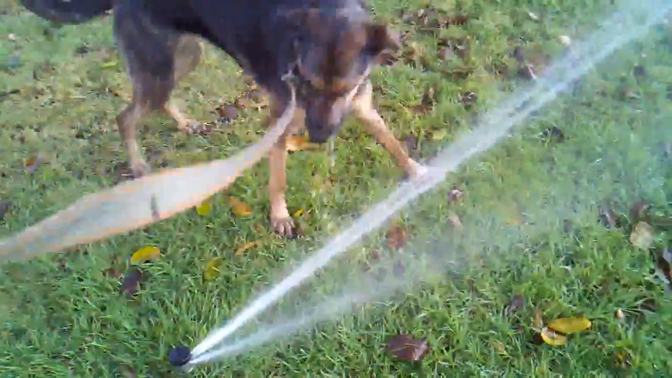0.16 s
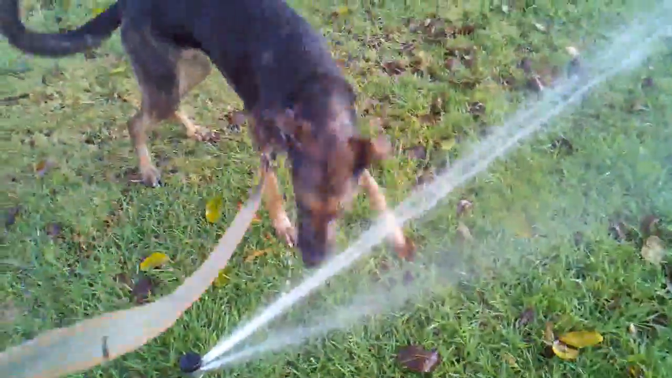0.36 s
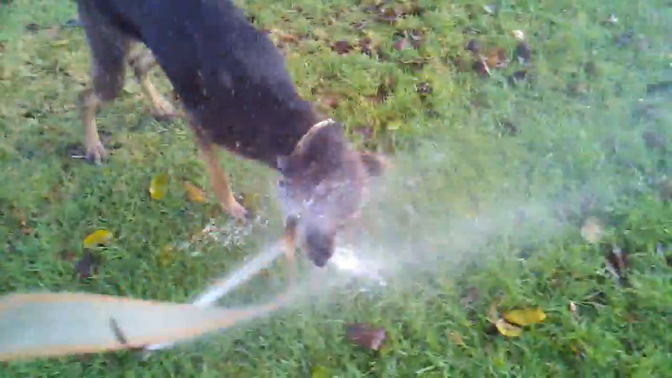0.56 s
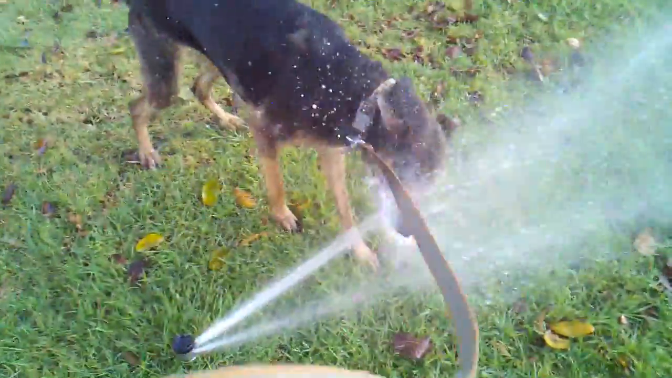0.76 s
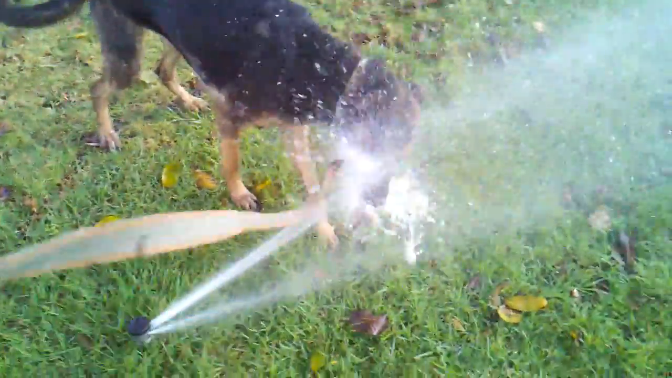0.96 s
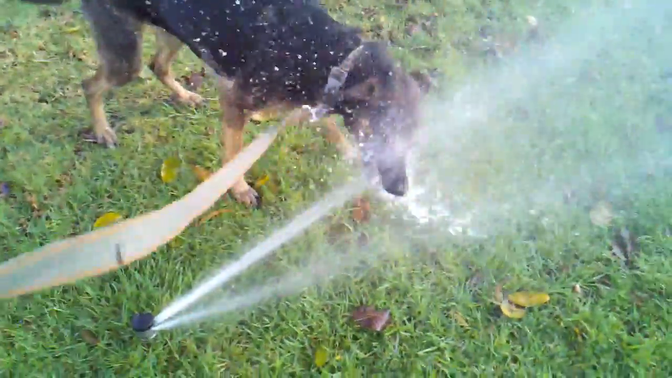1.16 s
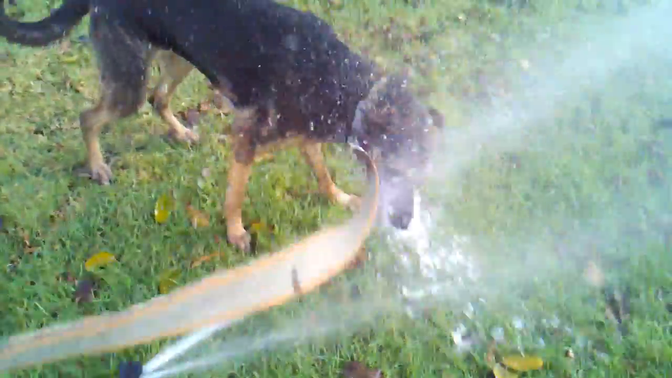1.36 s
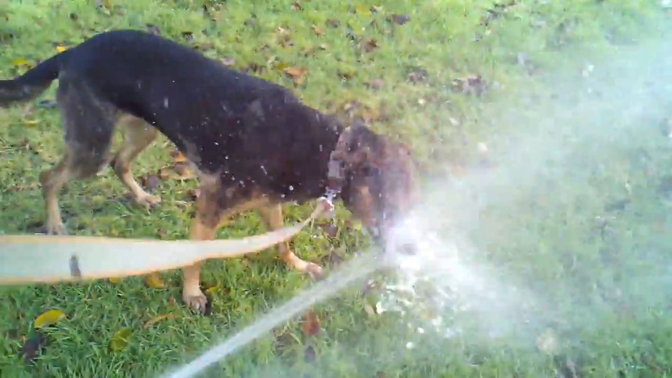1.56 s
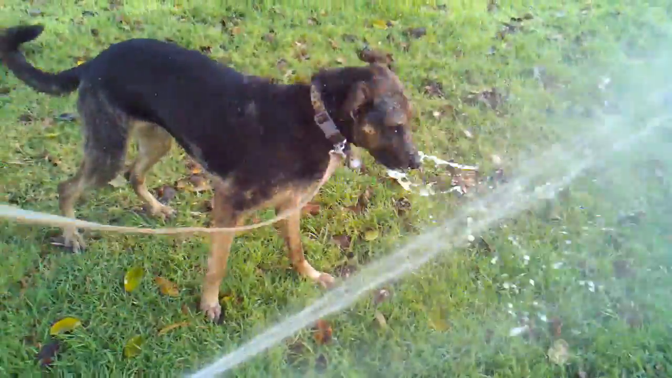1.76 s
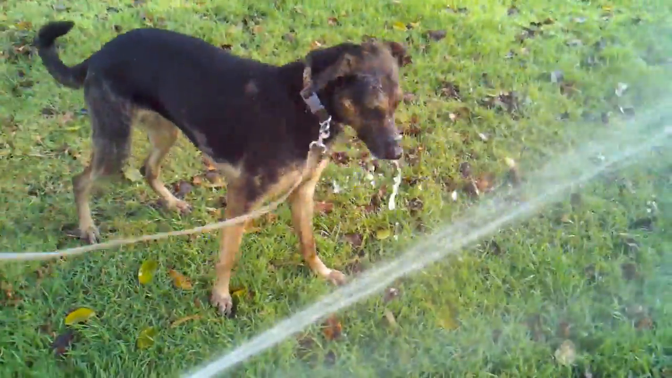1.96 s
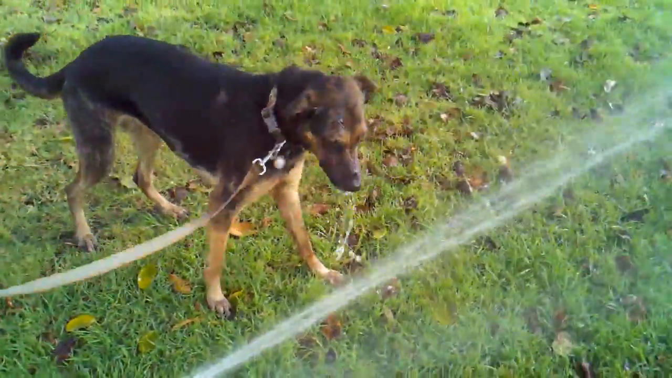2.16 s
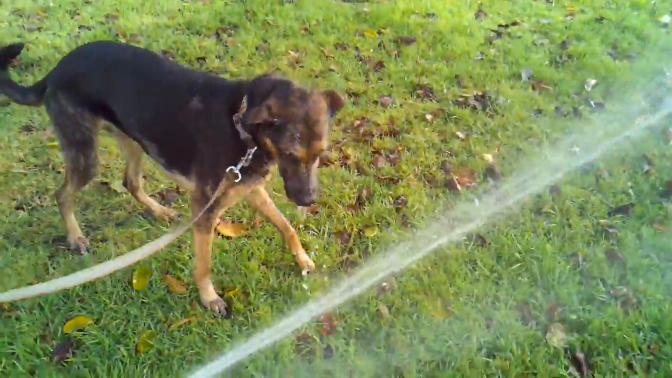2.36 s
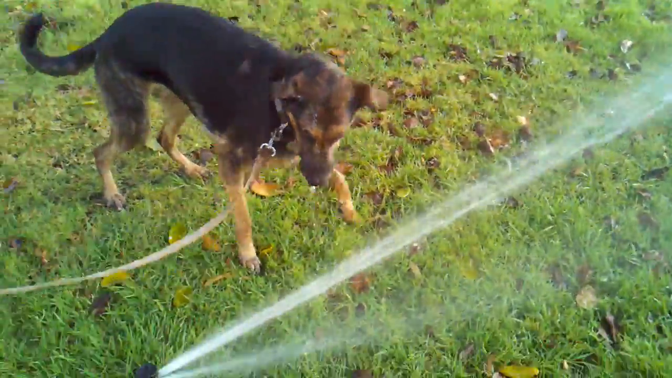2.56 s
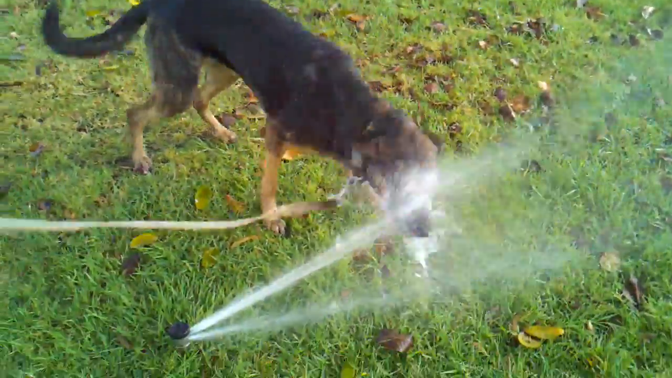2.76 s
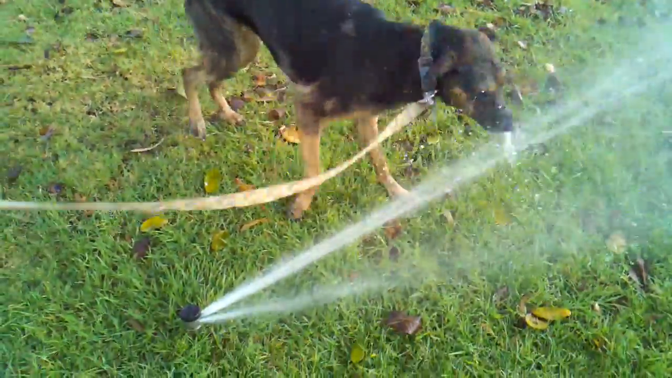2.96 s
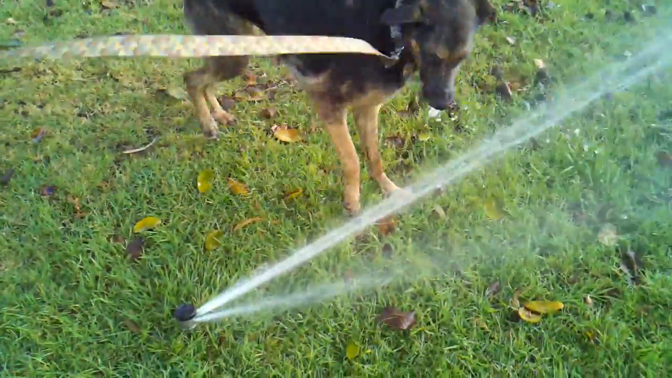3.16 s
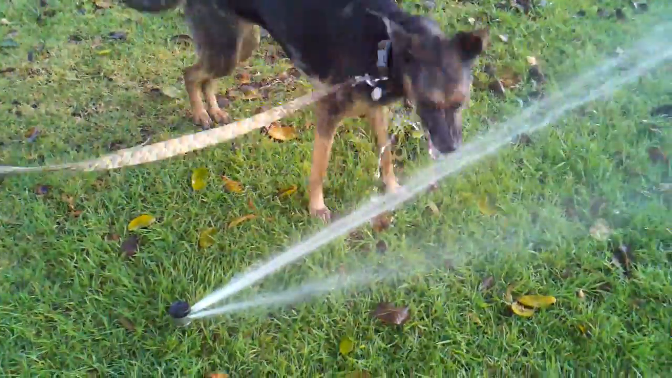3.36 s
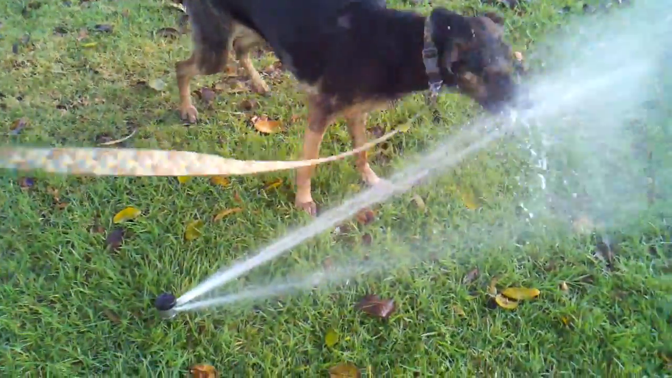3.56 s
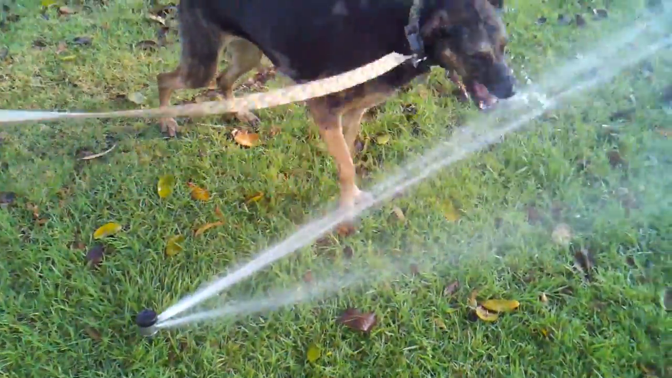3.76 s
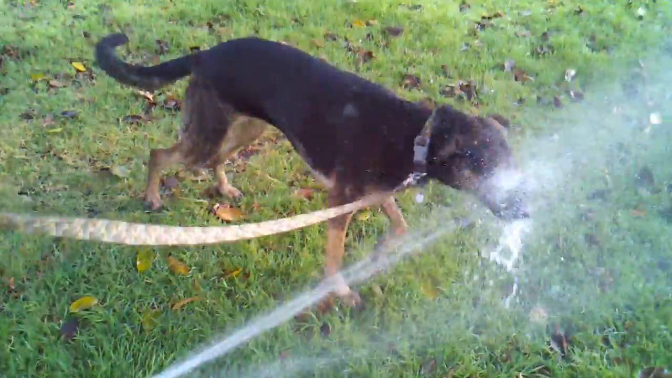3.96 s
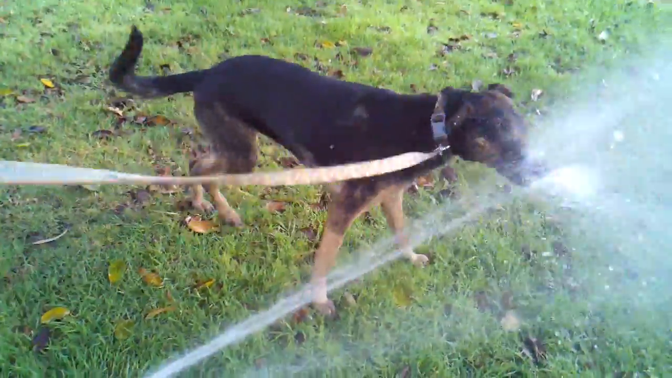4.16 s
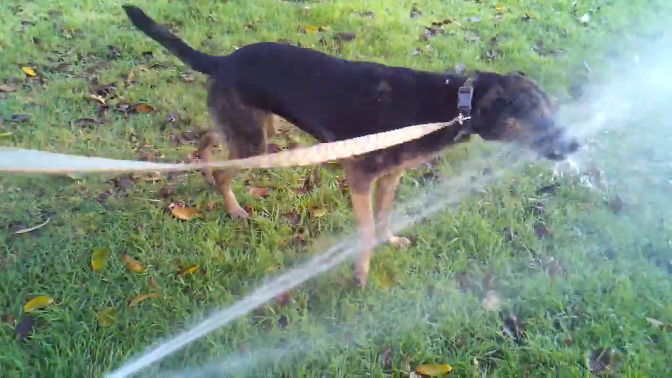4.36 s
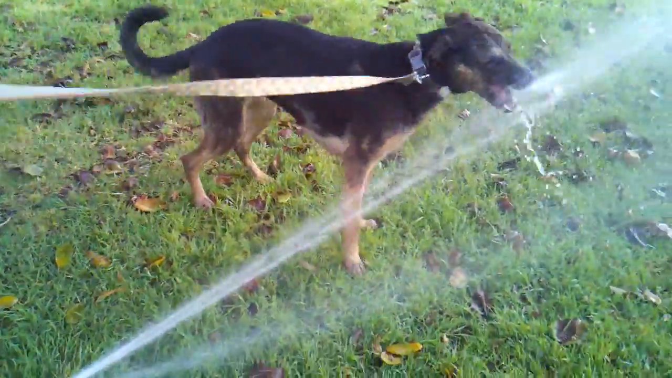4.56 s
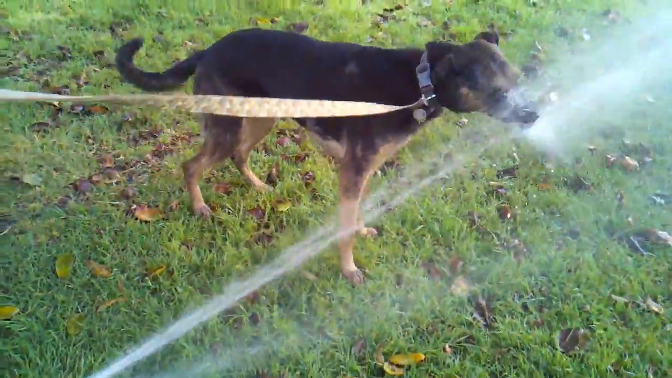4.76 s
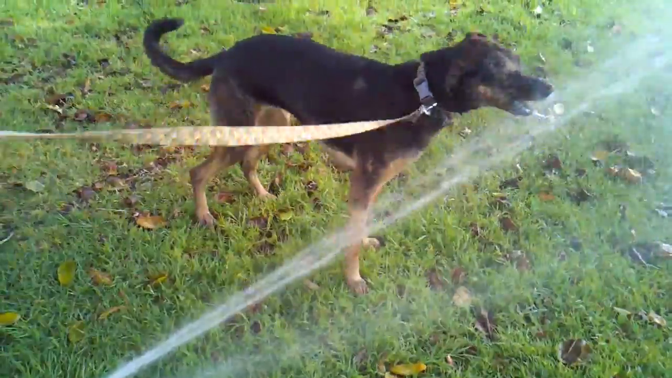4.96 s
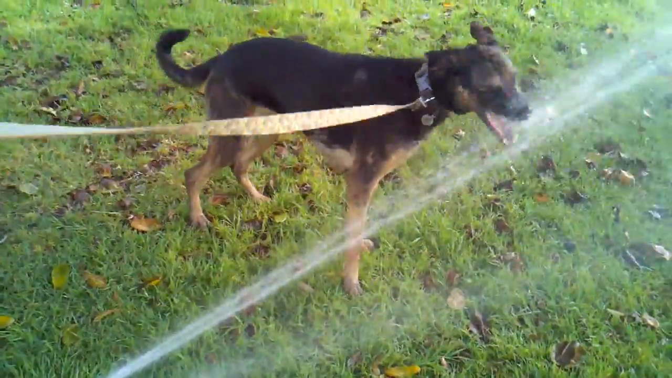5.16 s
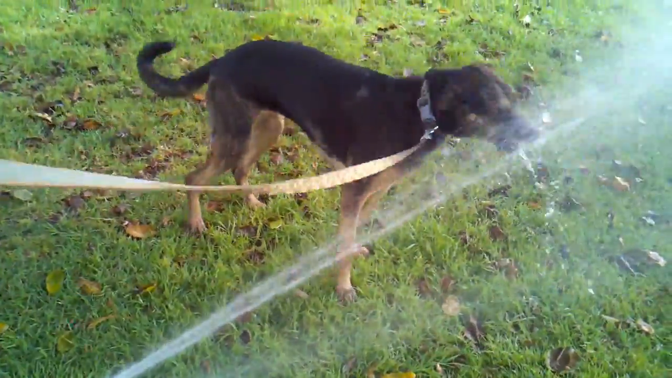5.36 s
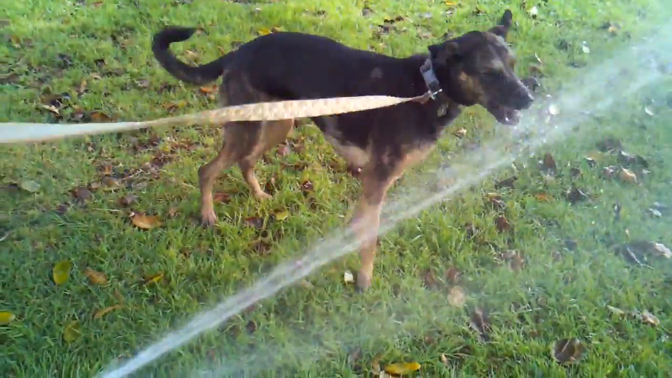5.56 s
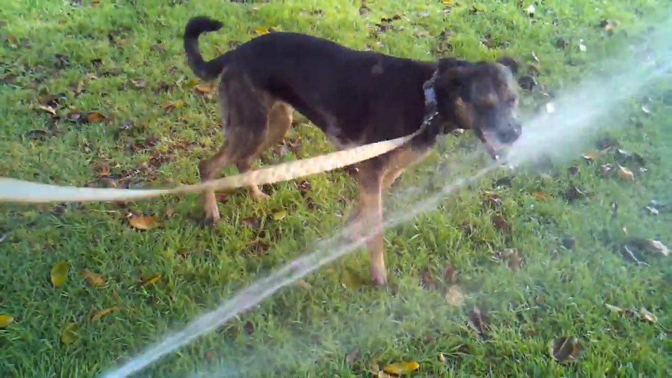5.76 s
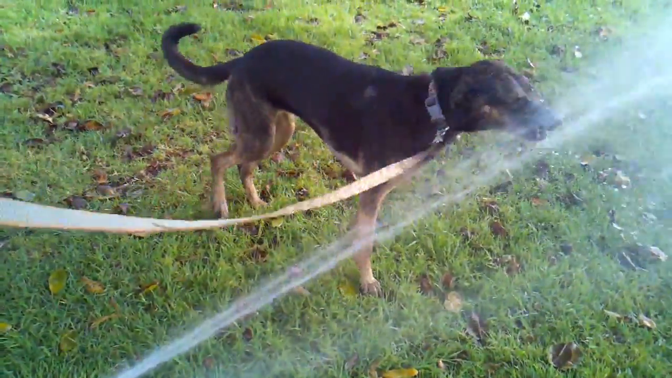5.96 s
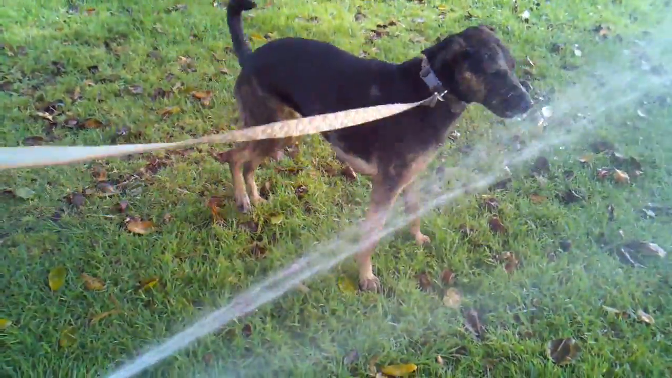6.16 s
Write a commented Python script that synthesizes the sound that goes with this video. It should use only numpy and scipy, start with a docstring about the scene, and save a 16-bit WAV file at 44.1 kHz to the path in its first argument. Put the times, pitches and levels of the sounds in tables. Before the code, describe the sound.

A lawn sprinkler hisses steadily while a dog bites at the jet in wet, gurgling splashes, with distant cars accelerating and soft handling knocks.

```python
"""Dog at the lawn sprinkler

In front, a sprinkler sizzles (shaped noise and random impacts) and patters on the grass, while a dog bites
at the jet: noise for the spray, resonated drops and bubbles for its mouth, decaying rings for slaps and plops.
Far off, a little to the right, cars pull away up a road: harmonic exhaust notes over banded rumble and tyre roar.
Close to the microphones, soft knocks on the hand-held camera ring as short, dull modes of its body."""
import sys
import numpy as np
from scipy import signal
from scipy.fft import rfft, irfft
from scipy.io import wavfile
from scipy.ndimage import uniform_filter1d

SR = 44100
rng = np.random.default_rng(int(sys.argv[2]) if len(sys.argv) > 2 else 0)


def to_wav(sig):
    """Store sig (one row per channel, or 1-D mono) as 16-bit WAV at the path in sys.argv[1].

    Samples outside -1..1 are clipped; the rate is SR.
    """
    pcm = np.clip(np.atleast_2d(sig), -1, 1) * 32767
    pcm = np.round(pcm).astype(np.int16)
    wavfile.write(sys.argv[1], SR, pcm.T)  # frames by channels


N = 274302
TIME, FREQ = np.arange(N) / SR, np.fft.rfftfreq(N, 1 / SR)

# All levels in the tables are relative: gains and placing may follow.
# the free jet, in front: start_s, sizzle_db, patter_on_grass_db, dip_in_sizzle_hz
JET = [(.52, -38.5, -44.5, 11600), (.9, -36, -41.5, 11800), (1.9, -33, -46.5, 11300),
       (2.7, -31, -44, 11350), (3.3, -31, -41.5, 10950), (4.6, -30, -48.5, 11200), (6.22, -30, -45, 11000)]
DIP_SHARE, DIP_WIDTH_HZ = 0.65, 630  # a narrow dip in the sizzle drifts as the camera moves
# distant traffic drawing nearer: start_s, rumble_db
ROAD = [(.5, -55), (1.3, -49.5), (2.2, -47), (2.8, -46), (5.3, -44.5), (6.22, -44.5)]
# swells of tyre roar: loudest_s, half_length_s, rise_db
TYRE_SWELLS = [(1.7, 0.28, 3), (3.056, 0.61, 4), (3.507, 0.22, 5), (5.095, 0.41, 4), (5.842, .2, 4.5)]
# a car pulling through a gear: throttle_opens_s, throttle_closes_s, first_firing_hz, climb_hz_per_s, level_db
PULLS = [(0, 0.52, 64, 1, -54), (1.601, 4.85, 45.69, 22.5, -49), (4.422, 6.22, 53.1, 38.5, -47.5)]
# partials of the exhaust note: multiple_of_firing_rate, level_db
EXHAUST = [(1, 0.5), (1.5, -6.5), (2, -1), (2.5, -11), (3, -4.5), (4, -9), (4.5, -13.5), (5, -27), (6, -14)]
THROTTLE_S, COAST_S = 0.57, 0.43  # rise and decay of the exhaust
COAST_SAG_PER_S = 0.57  # rate at which a coasting engine loses speed
BRIGHT_HZ, DULL_DB_PER_OCTAVE = 88, 10.5  # below this firing rate the upper partials weaken
# hollow tones in the road noise: start_s, end_s, first_pitch_hz, last_pitch_hz, level_db
DRONES = [(0.36, 1.55, 400, 398, -53.5), (3.35, 3.947, 180, 186, -47.5), (5.2, 5.346, 174, 180, -46),
          (5.45, 6.15, 314, 298, -49), (1.85, 2.05, 394, 370, -50.5), (2.801, 3.597, 551, 504, -46.5),
          (3.1, 3.342, 358, 380, -45), (3.462, 3.646, 387, 373, -41), (3.853, 4.4, 336, 351, -46.5),
          (4.48, 4.683, 211, 232, -42.5), (4.546, 5.1, 530, 495, -45.5), (5.75, 5.933, 450, 486, -44)]
DRONE_EDGE_S, DRONE_WIDTH_HZ = 0.065, 25
# bites at the jet: full_contact_s, held_s, rise_s, release_s, spray_db, swell_over_hold_db, champing_db,
# coarse_drops_db, mouth_drumming_db, mouth_resonance_hz
BITES = [(.565, .21, 0.016, .07, -33.5, 0, -1.5, -35.5, -38, 1160),
         (.636, 0.019, 0.026, .02, -37, 1, 2, -33, -46, 1200),
         (.79, 0.069, 0.027, 0.018, -40.5, 5, 0, -49.5, -39, 1331),
         (.901, .6, 0.027, .045, -31.5, -1.5, 1.4, -43, -36, 1480),
         (1.568, 0.17, 0.1, .041, -29.5, -0.5, 0.5, -55, -34.5, 1260),
         (2.854, 0.11, 0.018, 0.054, -26.5, 3, 0, -55, -32.5, 1060),
         (3.548, 0.12, 0.016, .026, -25.5, 3.5, -0.5, -35, -31.5, 1190),
         (4.009, 0.026, 0.028, 0.027, -25.5, -3.5, -2, -36, -37, 1100),
         (4.066, 0.26, 0.015, .055, -30.5, -1, 1, -36.5, -34.5, 1250),
         (4.45, 0.01, 0.055, 0.041, -28, 0, -0.5, -51, -30.5, 1360),
         (4.74, 0.1, 0.049, .03, -42, -7, -1, -50, -39, 1100),
         (4.91, 0.047, 0.06, .063, -28, 0.5, 1, -41, -35.5, 980),
         (5.365, 0.044, 0.054, 0.047, -26.5, 2, 1, -39, -38, 1450),
         (5.945, .035, .057, 0.088, -27.5, 1, 1, -39, -32.5, 1240)]
CHAMP_PER_S, LAST_CHAMP_S = 8.5, 0.04  # the champing cycle peaks this long before release begins
MOUTH_EDGE = 0.34  # the mouth fills and empties in this share of the spray's rise and release
MOUTH_SAG = 0.037  # its resonance sinks by this share either side of mid-bite as the jaws part
# the mouth rings hollow as it gulps: start_s, length_s, first_pitch_hz, last_pitch_hz, level_db
GULPS = [(0.612, 0.017, 1400, 1370, -35), (0.64, 0.012, 1110, 960, -33), (0.668, 0.01, 980, 1000, -42),
         (0.716, 0.033, 764, 920, -41.5), (5.363, 0.024, 1510, 1420, -41)]
GULP_EDGE_S, GULP_WIDTH_HZ = 0.0062, 110
# dull knocks on the camera body: peak_s, peak_db, pitch_hz, length_s, overtone_re_peak_db
KNOCKS = [(.6585, -14, 277, 0.009, -19), (.6866, -24, 497, 0.0099, -17), (1.8772, -28, 159, 0.014, -25),
          (1.9, -30, 115, 0.016, -14), (2.3541, -21, 206, 0.0065, -19), (2.644, -22, 201, 0.0082, -18),
          (2.6605, -12.5, 205, 0.0099, -14), (2.7176, -18.5, 190, 0.0064, -24),
          (2.73, -21.5, 150, 0.0094, -23), (2.776, -26, 180, 0.01, -25), (2.818, -26, 135, 0.016, -23),
          (3.793, -27, 113, 0.025, -25)]
KNOCK_OVERTONE, OVERTONE_SHARE = 1.87, 0.64  # pitch ratio of a higher body mode, and its share of the length
# slaps of water in the jaws and fat drops: start_s, peak_db, pitch_hz, length_s, wet_crack_re_peak_db
PLOPS = [(0.986, -32, 535, 0.0024, -14), (1.085, -28, 1310, 0.0033, -16), (1.0925, -20, 610, .0018, -14),
         (1.238, -31, 1680, 0.0044, -14), (1.354, -26.5, 1520, 0.0022, -5), (1.438, -26, 1400, .003, -7),
         (1.509, -27.5, 500, 0.0025, -14), (1.542, -20, 2620, 0.0005, -9.5),
         (1.5525, -19, 555, 0.0016, -16), (1.556, -27.5, 1080, 0.0037, -18),
         (1.666, -29.5, 1060, 0.0024, -14), (1.713, -31.5, 1730, .002, -5), (2.889, -32, 900, .003, -7),
         (2.94, -18.5, 760, 0.00071, -23), (3.033, -29, 540, 0.005, -14), (3.6434, -28, 322, 0.0035, -23.5),
         (3.65, -20.5, 3500, 0.0028, -21), (4.025, -19, 990, 0.0023, -24), (4.061, -25, 500, 0.004, -15),
         (4.1265, -22.5, 510, 0.0033, -15), (4.238, -27, 920, 0.0039, -17), (4.246, -26.5, 550, .0028, -17),
         (4.445, -27.5, 1430, 0.0037, -17), (4.876, -32, 812, 0.0017, -12),
         (4.893, -23.5, 1020, 0.003, -16), (4.949, -24, 930, .002, -14), (4.957, -24, 880, 0.0057, -20),
         (4.9956, -15.5, 850, 0.0013, -17), (4.998, -16.5, 770, 0.0015, -24),
         (5.955, -26, 1100, 0.00092, -8)]
PLOP_ATTACK_S, PLOP_GLIDE = 0.00044, 0.031  # the pitch rises by about this share as the air pocket closes
FALLBACK_S, FALLBACK_DB, FALLBACK_PITCH = 0.00469, -15.5, 0.82  # thrown water falls back softer and lower
SLAP_S = 0.0053  # decay of the wet crack

# colours of the noises: pitch_hz, level_db
JET_COLOUR = [(300, -22), (1200, -7), (2300, -9), (4000, -12), (5400, -15.5), (6500, -7.5), (8600, -4),
              (9400, 0), (10000, 1.1), (12000, 3), (13000, -1.5), (13850, 0.5)]
PATTER_COLOUR = [(200, -8), (600, -16), (1100, 3), (2200, -8.5), (5000, -12), (14000, -6)]
RUMBLE_COLOUR = [(20, -20), (45, -20), (80, -9.5), (125, -1), (175, 3), (260, -5.5), (400, -9.5),
                 (900, -64)]
TYRE_COLOUR = [(100, -21), (250, -6.5), (380, 0), (540, -1.5), (750, -5), (1000, -7), (1400, -18.5),
               (2200, -33), (5000, -97)]
SPRAY_COLOUR = [(100, -26), (400, -9.5), (1450, -8.5), (2000, -7.5), (2600, -6), (3400, -7), (5200, -8.5),
                (6600, -2), (8400, 1), (11500, -.5), (14000, .5)]
COARSE_COLOUR = [(500, -13.5), (1700, -1), (2500, 3), (3500, -0.5), (5000, -4.5), (9000, -9)]
SHUDDER_COLOUR = [(30, -22), (70, 2), (130, 0), (300, -12), (900, -41)]
SLAP_COLOUR = [(100, -18), (400, 0), (1200, -7), (2000, 0), (3500, -10), (6000, -2), (14000, -28)]

# likeness of the two microphone channels: pitch_hz, coherence (0 to 1, clipped)
LIKENESS = [(60, 1), (450, 0.48), (850, 0.85), (1100, 1), (1500, 1), (2000, 0.13), (2400, 1), (2800, 1),
            (3200, 0.26), (3700, 1), (4150, 0.94), (4600, .35), (5200, 0.81), (5900, 0.14), (14000, 0.45)]
# phase lead of the left channel, before the delay is added: pitch_hz, lead_rad
LEAD = [(50, -2.5), (130, -2), (260, -.8), (500, 0), (1400, 0), (1900, -.7), (2250, 0)]
DELAY_S, DELAY_FROM_HZ = 1 / 2600, 1300
FADE_START_S, FADE_S, FADE_POWER = 0.24, 0.34, 0.92  # the recorder fades in
EDGE_HZ = 13970  # upper band limit


def amp(db):
    """Decibels to gain."""
    return 10 ** (np.asarray(db) / 20)


def unit(x):
    """Scales to rms 1."""
    return x / np.sqrt(np.mean(x ** 2) + 1e-20)


def spectrum(points):
    """Reads a table on a log-frequency axis."""
    hz, value = np.transpose(points)
    return np.interp(np.log(FREQ + 1), np.log(hz + 1), value)


def curves(rows):
    """Reads every column of a table at each sample."""
    s, *columns = np.transpose(rows)
    return [np.interp(TIME, s, c) for c in columns]


def held(start, end, rise_s, release_s):
    """Envelope that rises to 1 at start, holds until end and dies away, with Gaussian edges."""
    early = np.minimum(TIME - start, 0) / rise_s
    late = np.maximum(TIME - end, 0) / release_s
    return np.exp(-early ** 2 - late ** 2)


def wander(rate_hz):
    """Slow chance of rms 1, up to about the given rate."""
    return unit(irfft(rfft(rng.standard_normal(N)) / (1 + (FREQ / rate_hz) ** 4), N))


def hiss():
    """Two unrelated white noises."""
    return rng.standard_normal((2, N))


def drops(per_s, spread_db):
    """Random impacts in two channels, with exponentially distributed level offsets; rms 1."""
    size = amp(spread_db * np.minimum(rng.exponential(1, N), 4))
    strikes = rng.random(N) < per_s / SR
    return unit(rng.uniform(-1.04, 1, (2, N)) * size * strikes)


def bubbles(per_s, low_hz, high_hz, cycles, count=32):
    """Small bubbles of many sizes, each ringing briefly and rising a little in pitch."""
    out = np.zeros((2, N))
    for hz in np.geomspace(low_hz, high_hz, count):
        age = np.arange(0, 5, hz / cycles / SR)  # in decay times
        envelope = (1 - np.exp(-10 * age)) * np.exp(-age)
        ring = envelope * np.sin(2 * np.pi * cycles * age * (1 + 0.0248 * age))
        out += signal.oaconvolve(drops(per_s / count, spread_db=2.5), ring[None], axes=1)[:, :N]
    return out


def left_lead():
    """Radians by which the left channel leads at each frequency."""
    delay = 2 * np.pi * DELAY_S * np.maximum(FREQ - DELAY_FROM_HZ, 0)
    # in the middle range the channels linger in step or in opposition
    linger = np.sin(2 * delay) / 2 / (1 + (FREQ / 7000) ** 4)
    return spectrum(LEAD) + delay - linger


def paired(x):
    """One sound at both channels, with the left's phase lead."""
    return np.array([x, irfft(rfft(x) * np.exp(-1j * left_lead()), N)])


def heard(pair, colour=((20, 0), (20000, 0))):
    """Colours two unrelated signals and blends them into left and right, rms 1."""
    same = np.clip(spectrum(LIKENESS), 0, 1)
    common, apart = rfft(pair) * amp(spectrum(colour)) * np.sqrt([1 + same, 1 - same])
    left = common + apart
    right = (common - apart) * np.exp(-1j * left_lead())
    return unit(irfft(np.array([left, right]), N))


def placed(x, right_db):
    """Leans a sound to the right by a level difference."""
    return x * amp(np.array([[-right_db], [right_db]]) / 2)


def resonate(x, hz, width_hz):
    """A resonance that follows the curve hz: shift it to zero, smooth, shift back."""
    turn = np.exp(2j * np.pi * np.cumsum(hz) / SR)
    r = np.exp(-np.pi * width_hz / SR)
    return 2 * (turn * signal.lfilter([1 - r], [1, -r], x / turn)).real


def patchy(x, depth_db, width_hz, length_s):
    """Lets the colour shift at random in patches of a given width and length; rms 1."""
    window, hop = 512, 128
    z = signal.stft(x, nperseg=window, noverlap=window - hop)[2]
    field = rng.standard_normal(z.shape[1:])
    bins = max(1, round(width_hz * window / SR))
    frames = max(1, round(length_s * SR / hop))
    field = uniform_filter1d(field, bins, axis=0)
    field = unit(uniform_filter1d(field, frames, axis=1))
    return unit(signal.istft(z * amp(depth_db * field), nperseg=window, noverlap=window - hop)[1][:, :N])


def jet():
    """The nozzle's fine sizzle, and its spray pattering on the grass."""
    sizzle_db, patter_db, dip_hz = curves(JET)
    sizzle = heard(hiss() + 0.41 * drops(per_s=5000, spread_db=1.0), JET_COLOUR)
    sizzle = sizzle * amp(0.16 * wander(28))
    sizzle = sizzle - DIP_SHARE * resonate(sizzle, dip_hz, DIP_WIDTH_HZ)
    sizzle = patchy(sizzle, depth_db=2.0, width_hz=450, length_s=0.033)
    patter = heard(drops(per_s=900, spread_db=1), PATTER_COLOUR)
    return amp(sizzle_db) * sizzle + amp(patter_db) * patter


def road():
    """Distant low noise for the rumble, and mid-band tyre roar that swells now and then."""
    rumble_db, = curves(ROAD)
    tyre_db = rumble_db + sum(db * held(s, s, half, half) for s, half, db in TYRE_SWELLS)
    rumble = heard(hiss(), RUMBLE_COLOUR) * amp(rumble_db + 3.0)
    tyres = patchy(heard(hiss(), TYRE_COLOUR), depth_db=2.5, width_hz=90, length_s=.15)
    tyres = tyres * amp(tyre_db + 3.0)
    return placed(rumble, right_db=6.0) + placed(tyres, right_db=5.0)


def engines():
    """Each exhaust note climbs through a gear and sinks off the throttle; its partials come and go."""
    out = np.zeros((2, N))
    for opens, closes, first_hz, climb_hz_per_s, level_db in PULLS:
        hz = first_hz + climb_hz_per_s * (np.clip(TIME, opens, closes) - opens)
        hz = hz * np.exp(-COAST_SAG_PER_S * np.maximum(TIME - closes, 0))
        throttle = held(opens + THROTTLE_S, closes, THROTTLE_S, COAST_S)
        phase = 2 * np.pi * np.cumsum(hz * (1 + 0.003 * wander(8.7))) / SR
        for multiple, db in EXHAUST:
            lead = np.interp(multiple * hz, *np.transpose(LEAD))
            waver_db = (1.0 + 2.0 * np.log(multiple)) * wander(1.9)
            dull_db = DULL_DB_PER_OCTAVE * np.minimum(np.log2(hz / BRIGHT_HZ), 0) * (multiple > 1)
            gain = throttle * amp(level_db + db + waver_db + dull_db)
            out += gain * np.cos([multiple * phase, multiple * phase - lead])
    return placed(amp(2.0) * out, right_db=6.5)


def drones():
    """Road noise rings in narrow bands that drift slowly in pitch."""
    out = np.zeros(N)
    noise = rng.standard_normal(N)
    for start, end, first_hz, last_hz, db in DRONES:
        gain = held(start, end, DRONE_EDGE_S, DRONE_EDGE_S)
        span = gain > .01
        hz = np.interp(TIME[span], [start, end], [first_hz, last_hz])
        ring = resonate(resonate(noise[span], hz, DRONE_WIDTH_HZ), hz, 3 * DRONE_WIDTH_HZ)
        out[span] += amp(db) * gain[span] * unit(ring)
    return placed(paired(out), right_db=5.0)


def bites():
    """Gains of spray, coarse drops and mouth, and the mouth's resonance, summed as power over the bites."""
    spray_power, coarse_power, mouth_power, weighted_hz = np.zeros((4, N))
    for start, hold, rise, release, spray_db, swell_db, champ_db, coarse_db, mouth_db, hz in BITES:
        end = start + hold
        progress = np.clip((TIME - start) / hold, 0, 1) - .5
        # the jaws champ on the water; a negative champ_db turns the cycle over
        champ = np.cos(2 * np.pi * CHAMP_PER_S * (TIME - end + LAST_CHAMP_S))
        contact = held(start, end, rise, release)
        spray_power += (contact * amp(spray_db + swell_db * progress + champ_db * champ)) ** 2
        filled = held(start, end, MOUTH_EDGE * rise, MOUTH_EDGE * release)
        coarse_power += (filled * amp(coarse_db)) ** 2
        power = (filled * amp(mouth_db)) ** 2
        mouth_power += power
        weighted_hz += power * hz * (1 - 2 * MOUTH_SAG * progress)
    mouth_hz = weighted_hz / (mouth_power + 1e-20)
    return np.sqrt(spray_power), np.sqrt(coarse_power), np.sqrt(mouth_power), mouth_hz


def splashes():
    """The jet shatters on the muzzle in spray and coarse drops, and drums and bubbles in the hollow mouth."""
    spray_gain, coarse_gain, mouth_gain, mouth_hz = bites()
    spray = heard(1.7 * hiss() + drops(per_s=3700, spread_db=1.0), SPRAY_COLOUR)
    spray = patchy(spray, depth_db=2.5, width_hz=700, length_s=.02)
    spray = spray * amp(5.0 + 0.5 * wander(38))
    coarse = heard(drops(per_s=2200, spread_db=-0.5), COARSE_COLOUR)
    coarse = patchy(coarse, depth_db=3.5, width_hz=400, length_s=.015)
    drumming = resonate(drops(per_s=1100, spread_db=0.2), mouth_hz, width_hz=720)
    gurgle = heard(resonate(drumming, mouth_hz, width_hz=820))
    froth = heard(bubbles(per_s=450, low_hz=765, high_hz=4520, cycles=9.4))
    mouth = gurgle * amp(-2.0 + 0.53 * wander(35)) + froth * amp(-10.5)
    return spray_gain * spray + coarse_gain * coarse + mouth_gain * mouth


def gulps():
    """Drops drum into a narrow resonance that glides as the mouth changes shape."""
    out = np.zeros(N)
    drumming = drops(per_s=2300, spread_db=3.0)[0]
    for s, length, first_hz, last_hz, db in GULPS:
        gain = held(s, s + length, GULP_EDGE_S, GULP_EDGE_S)
        span = gain > .01
        hz = np.interp(TIME[span], [s - GULP_EDGE_S, s + length + GULP_EDGE_S], [first_hz, last_hz])
        ring = resonate(resonate(drumming[span], hz, GULP_WIDTH_HZ), hz, 2 * GULP_WIDTH_HZ)
        out[span] += amp(db) * gain[span] * unit(ring)
    return out


def blips(rows, lead, glide):
    """Brief rings that swell to a peak and die; the pitch slides by the share glide either side of it."""
    out = np.zeros((2, N))
    for s, db, hz, length in rows:
        span = (TIME > s - length / 2) & (TIME < s + 6 * length)
        t = TIME[span] - s
        u = 1 + 2 * t / length
        swell = (u * np.exp(1 - u)) ** 2
        sliding_hz = hz * (1 + glide * np.tanh(t / length))
        phase = 2 * np.pi * np.cumsum(sliding_hz) / SR + rng.uniform(0, 2 * np.pi)
        out[:, span] += amp(db) * swell * np.cos([phase, phase - lead])
    return out


def knocks():
    """Each knock rings two body modes out of step between the channels, with a short low shudder."""
    thuds = [row[:4] for row in KNOCKS]
    shudder_gain = sum(amp(db) * np.exp(-abs(TIME - s - length) / (1.5 * length))
                       for s, db, hz, length in thuds)
    shudder = unit(irfft(rfft(rng.standard_normal(N)) * amp(spectrum(SHUDDER_COLOUR)), N))
    shaking = blips(thuds, lead=-2.58, glide=-0.023)
    shaking = shaking + amp(-14) * shudder_gain * np.array([shudder, -shudder])
    overtones = [(s, db + over_db, hz * KNOCK_OVERTONE, length * OVERTONE_SHARE)
                 for s, db, hz, length, over_db in KNOCKS]
    shaking = shaking + blips(overtones, lead=-1.5, glide=-0.035)
    low_cut_hz = 55  # the knocks carry little deep bass
    return irfft(rfft(shaking) * FREQ ** 4 / (FREQ ** 4 + low_cut_hz ** 4), N)


def plops():
    """Each slap starts abruptly with a wet crack, rings briefly, and is followed by the water falling back."""
    rings, crack = np.zeros((2, N))
    for s, db, hz, length, crack_db in PLOPS:
        span = slice(round((s - .005) * SR), round((s + .05) * SR))
        for late, softer_db, pitch in ((0, 0, hz), (FALLBACK_S, FALLBACK_DB, hz * FALLBACK_PITCH)):
            t = TIME[span] - s - late
            age = np.maximum(t, 0)
            strike = amp(db + softer_db) * np.exp(-(np.minimum(t, 0) / PLOP_ATTACK_S) ** 2)
            decay = (1 + 2 * age / length) * np.exp(-2 * age / length)
            cycles = rng.random() + pitch * t * (1 + PLOP_GLIDE * np.tanh(age / length))
            rings[span] += strike * decay * np.cos(2 * np.pi * cycles)
            crack[span] += strike * amp(crack_db) * np.exp(-age / SLAP_S)
    return paired(rings + crack * heard(hiss(), SLAP_COLOUR)[0])


def scene():
    """Water in front, traffic behind, knocks on the camera itself."""
    water = jet() + splashes() + plops() + gulps()
    water = placed(water, right_db=.35)
    return water + knocks() + road() + drones() + engines()


def record(dry):
    """The opening fade, then the band limit."""
    fade = np.clip((TIME - FADE_START_S) / FADE_S, 0, 1) ** FADE_POWER
    lowpass = signal.firwin(801, EDGE_HZ, window=("kaiser", 9), fs=SR)
    return signal.oaconvolve(dry * fade, lowpass[None], "same")


dry = scene()
out = record(dry)
to_wav(out)
```